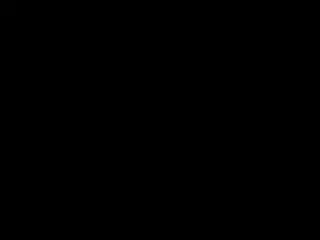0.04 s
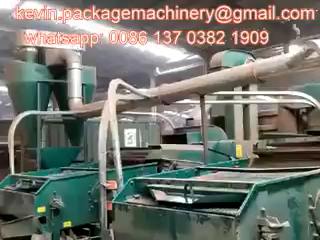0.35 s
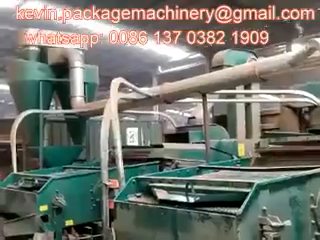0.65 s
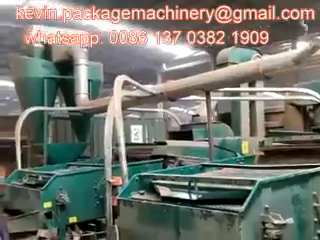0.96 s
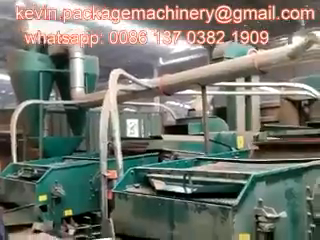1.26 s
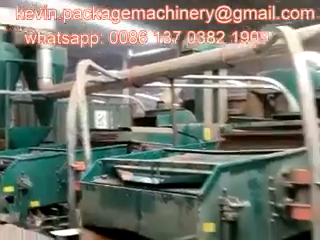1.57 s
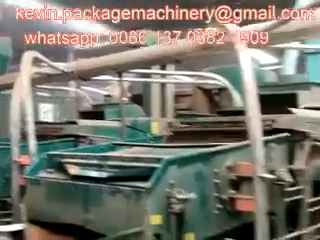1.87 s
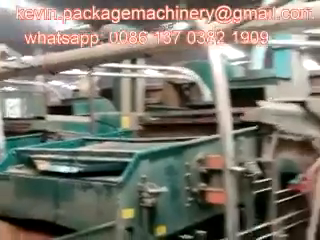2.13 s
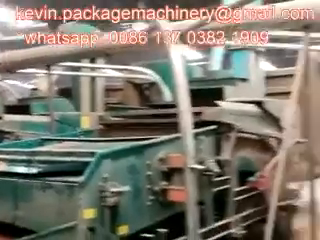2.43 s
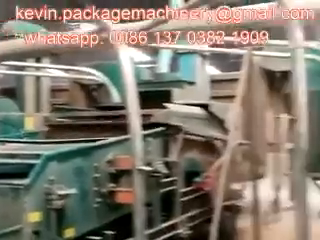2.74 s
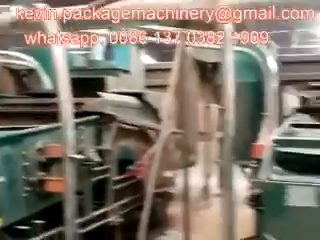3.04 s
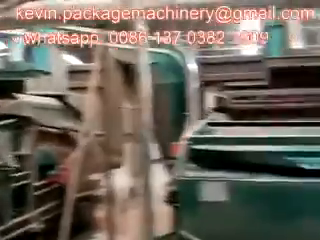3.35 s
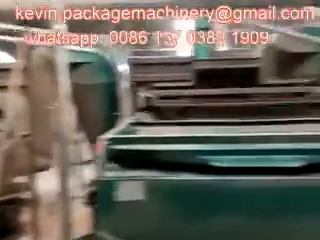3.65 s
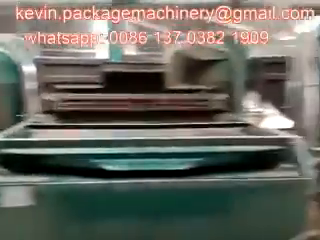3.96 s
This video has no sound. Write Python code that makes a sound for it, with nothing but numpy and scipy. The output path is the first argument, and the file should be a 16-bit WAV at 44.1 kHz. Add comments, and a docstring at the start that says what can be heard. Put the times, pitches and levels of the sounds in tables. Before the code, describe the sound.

A loud roar of heavy factory machines cuts in at about 0.2 seconds and runs steadily until 4 seconds. It holds a low, fixed-pitch drone, humming and whining blowers and bright hiss from air ducts, slightly overloading the moving microphone. The deepest hum sinks around 2.5 seconds and returns after 3 seconds, while one blower's tone fades towards the end.

```python
"""A factory hall, a small microphone carried slowly past a line of heavy machines, all running.
The sound cuts in at 0.2 s: a shaking drive drones at one fixed speed, blowers hum and whine over a
broad roar and the hiss of air in ducts, and the noise overloads the microphone. Along the walk the
drone's partials swell and fade in the hall's standing waves; the lowest sinks around 2.5 s and is
back after 3 s, while the main blower's tone falls away towards the end."""
import sys
import numpy as np
from scipy import signal
from scipy.fft import rfft, irfft
from scipy.io import wavfile
from scipy.ndimage import uniform_filter1d

SR = 44100
rng = np.random.default_rng(int(sys.argv[2]) if len(sys.argv) > 2 else 0)


def log_audio(samples):
    """Write samples as a 16-bit WAV file to the path given in sys.argv[1]."""
    # one column per channel
    frames = np.atleast_2d(samples).T
    # limit to full scale, then quantise
    limited = np.clip(frames, -1, 1)
    pcm = np.round(limited * 32767).astype(np.int16)
    wavfile.write(sys.argv[1], SR, pcm)


N = 176400


def amp(db):
    """Decibels to gain."""
    return 10 ** (np.asarray(db) / 20)


def unit(x):
    """Scales to an rms of 1."""
    return x / np.sqrt(np.mean(abs(x) ** 2) + 1e-20)


def along_walk(curve):
    """Gain at every sample from (t/s, level/dB) points."""
    times, db = np.transpose(curve)
    return amp(np.interp(np.arange(N) / SR, times, db))


def wander(rate_hz):
    """Complex random motion no faster than about rate_hz."""
    real, imag = rng.standard_normal((2, N))
    rolloff = 1 + (np.fft.fftfreq(N, 1 / SR) / rate_hz) ** 4
    return unit(np.fft.ifft((real + 1j * imag) / rolloff))


def tone(hz, waver):
    """A sine of fixed pitch that wavers a little in the moving air."""
    phasor = np.exp(2j * np.pi * (hz * np.arange(N) / SR + rng.random()))
    return np.sqrt(2) * (phasor * (1 + waver * wander(rate_hz=6.6))).real


def turbulence(spectrum, patch_db, flutter_db):
    """Noise of a given colour at an rms of 1, with drifting patches and a flutter across all bands."""
    _, _, bands = signal.stft(rng.standard_normal(N), SR, nperseg=512, noverlap=384)
    patches = uniform_filter1d(rng.standard_normal(bands.shape), size=20, axis=1)  # smooth in time
    patches = unit(uniform_filter1d(patches, size=5, axis=0))  # and in frequency
    noise = signal.istft(bands * amp(patch_db * patches), nperseg=512, noverlap=384)[1][:N]
    hz, db = np.transpose(spectrum)
    colour = amp(np.interp(np.log(np.fft.rfftfreq(N, 1 / SR) + 1), np.log(hz), db))
    flutter = amp(flutter_db * unit(wander(rate_hz=15).real))
    return unit(irfft(rfft(noise) * colour, N) * flutter)


# The drive's harmonics 1 to 4 as the moving microphone meets them: t/s, relative level/dB
HARMONIC_1 = [(0.25, -12.0), (0.7, -9), (1.1, -10.5), (1.5, -12.5), (1.9, -14), (2.35, -17.4), (2.6, -17.5),
              (3.05, -10.5), (3.55, -9), (4, -8.9)]
HARMONIC_2 = [(0.25, -28.2), (0.6, -26), (0.9, -32), (1.25, -19.5), (1.8, -15.5), (2.5, -19), (3.2, -18.7),
              (3.5, -18), (3.7, -29), (3.9, -16)]
HARMONIC_3 = [(0.25, -22), (0.45, -15.4), (0.7, -17.7), (0.9, -38), (1.2, -29), (1.4, -22.5), (1.7, -28),
              (1.95, -16), (2.15, -16.5), (2.42, -28), (2.7, -21.5), (3.0, -17.5), (3.27, -26), (3.45, -17),
              (3.75, -14.9), (4, -24.5)]
HARMONIC_4 = [(0.25, -20), (0.5, -21), (0.72, -19), (0.9, -38), (1.35, -17.5), (1.62, -31), (1.8, -21),
              (2.02, -34.0), (2.5, -29), (2.72, -49), (2.87, -21), (3.35, -34), (3.55, -20.8), (3.7, -19),
              (3.9, -24)]


def shaking_drive(shake_hz=95.7):
    """The drive drones in four harmonics, each with its own standing-wave pattern in the hall."""
    curves = [HARMONIC_1, HARMONIC_2, HARMONIC_3, HARMONIC_4]
    return sum(along_walk(curve) * tone(k * shake_hz, waver=0.06) for k, curve in enumerate(curves, 1))


# The main blower's tone along the walk: t/s, relative level/dB
BLOWER_WALK = [(0.25, -17), (0.5, -17.4), (0.73, -23.5), (1, -15), (1.4, -16.5), (2.1, -19), (2.7, -17.5),
               (3.1, -19), (4, -26.6)]


def main_blower(blade_hz=471):
    """The passing blades make one wavering tone."""
    return along_walk(BLOWER_WALK) * tone(blade_hz, waver=0.23)


# Weaker tones of motors and fans in the hall: f/Hz, width/Hz, level/dB
MOTOR_TONES = [(32, 3, -51), (48.5, 2, -37), (147.8, 3.4, -30.5), (346.4, 2.4, -26), (477.4, 5.5, -26.5),
               (584, 3.9, -32.5), (869, 2, -30.5), (931, 2.7, -36.5), (1176, 20.6, -26), (1369, 1.7, -31.5),
               (1888, 33, -33), (2357, 27, -35.5), (7900, 80, -35)]


def motors_and_fans():
    """Steady hums and whines, each blurred by the hall into a narrow band of noise."""
    whines = np.zeros(N)
    for hz, width_hz, db in MOTOR_TONES:
        blur = wander(width_hz / 2)
        blur /= np.sqrt(uniform_filter1d(abs(blur) ** 2, size=SR))  # evens out swells longer than 1 s
        phasor = np.exp(2j * np.pi * hz * np.arange(N) / SR)
        whines += amp(db) * unit((blur * phasor).real)
    return whines


# Spectrum of the hall's roar at the microphone: f/Hz, relative level/dB
ROAR_SPECTRUM = [(20, -27), (42, -9.5), (58, -4.5), (80, 2), (115, -0.5), (250, 1), (400, -3), (470, -2),
                 (530, -5.5), (900, -6.5), (1500, -10.5), (1850, -13.5), (2050, -19.5), (3200, -19.5),
                 (14000, -39)]
# The roar along the walk: t/s, relative level/dB
ROAR_LEVELS = [(.25, -0.5), (1.2, 0), (2, -0.65), (2.65, 0.1), (3.2, 0), (4, -0.5)]


def hall_roar():
    """All the machines blend into a low, broad roar that hardly changes from spot to spot."""
    return along_walk(ROAR_LEVELS) * turbulence(ROAR_SPECTRUM, patch_db=1.0, flutter_db=0.18)


# Spectrum of the ducts' hiss at the microphone: f/Hz, relative level/dB
HISS_SPECTRUM = [(500, -22), (2300, -3), (3200, -7), (4300, -2.5), (5300, -1.5), (7200, -1.5), (8400, 1),
                 (10000, -0.4), (12000, -3.5), (13800, -5.5)]


def duct_hiss():
    """Air and material rush through the ducts with a bright, steady hiss."""
    return turbulence(HISS_SPECTRUM, patch_db=1.0, flutter_db=0.23)


def scene():
    """All machines run without a pause; one microphone feeds both channels."""
    tones = amp(2) * shaking_drive() + amp(1) * main_blower() + motors_and_fans()
    mix = tones + amp(-10) * hall_roar() + amp(-14) * duct_hiss()
    return np.array([mix, mix])


def record(dry):
    """The small microphone cuts in abruptly, overloads softly and loses the highest treble."""
    start_s, rise_s = 0.2155, 0.0044
    ceiling, cutoff_hz = 1.025, 13930
    fade_in = np.clip((np.arange(N) / SR - start_s) / rise_s, 0, 1)
    overloaded = ceiling * np.tanh(dry * fade_in / ceiling)
    lowpass = signal.firwin(1023, cutoff_hz, window=("kaiser", 9), fs=SR)
    return signal.oaconvolve(overloaded, lowpass[None], "same", axes=1)


dry = scene()
out = record(dry)
log_audio(out)
```